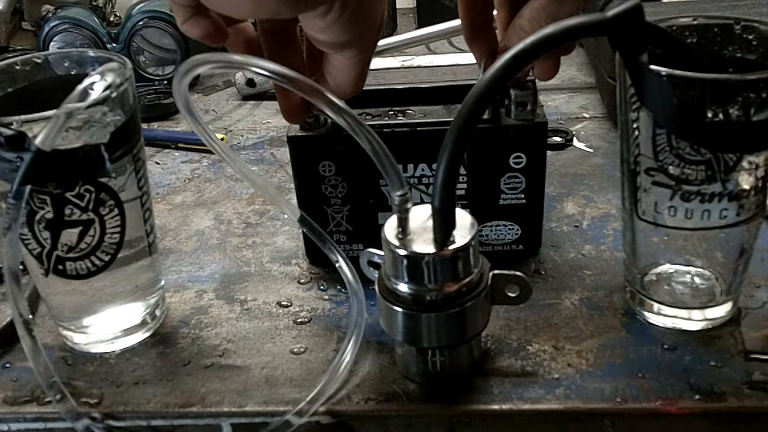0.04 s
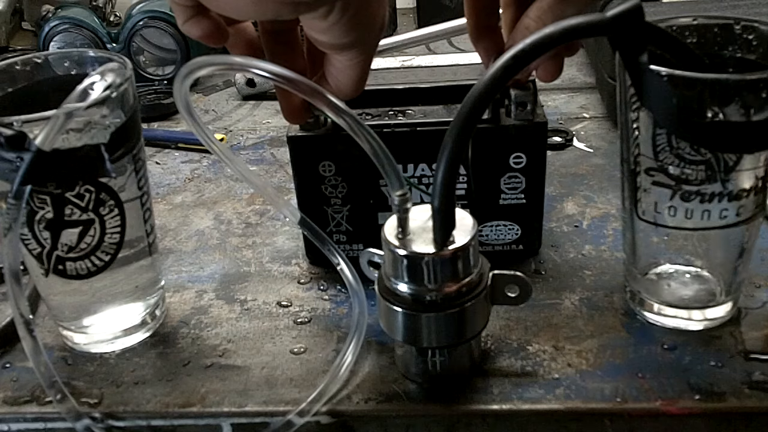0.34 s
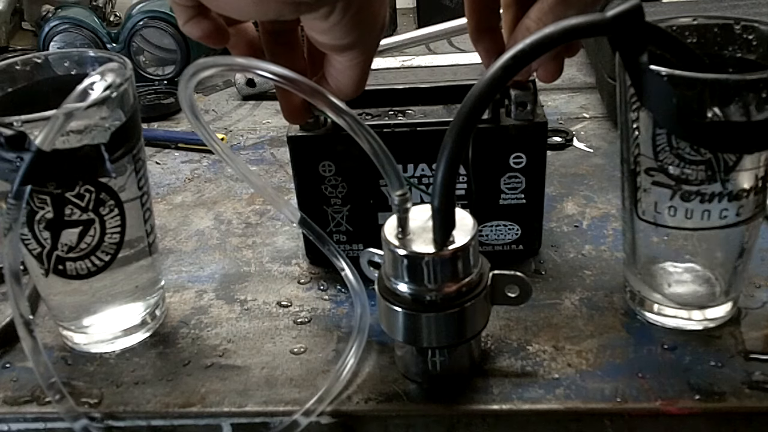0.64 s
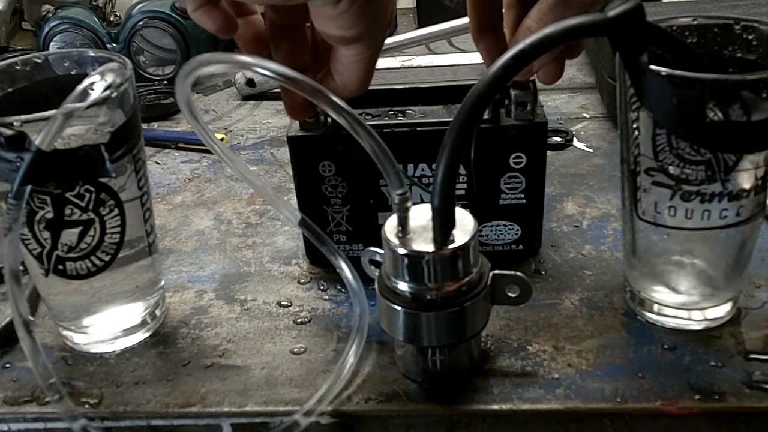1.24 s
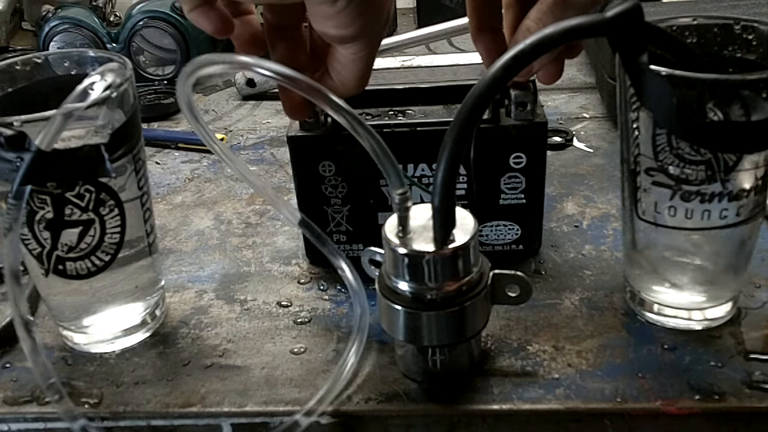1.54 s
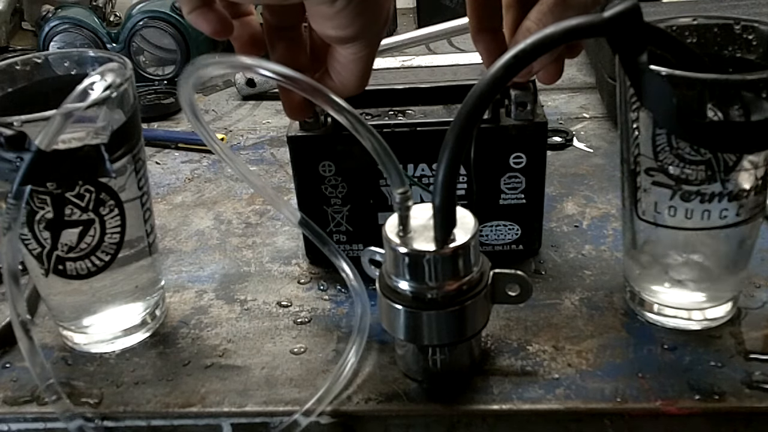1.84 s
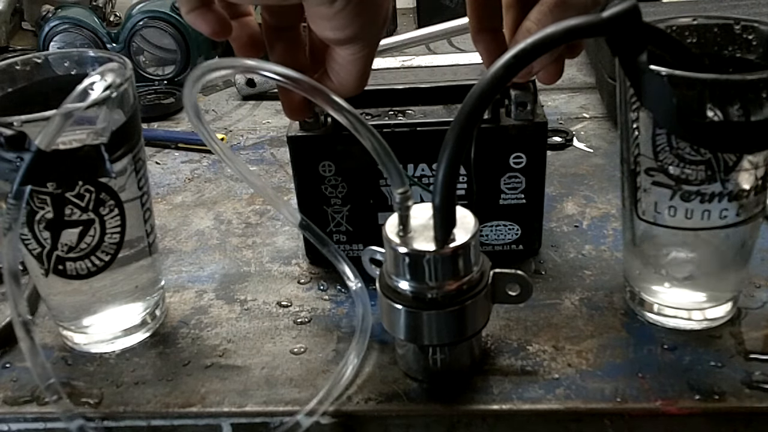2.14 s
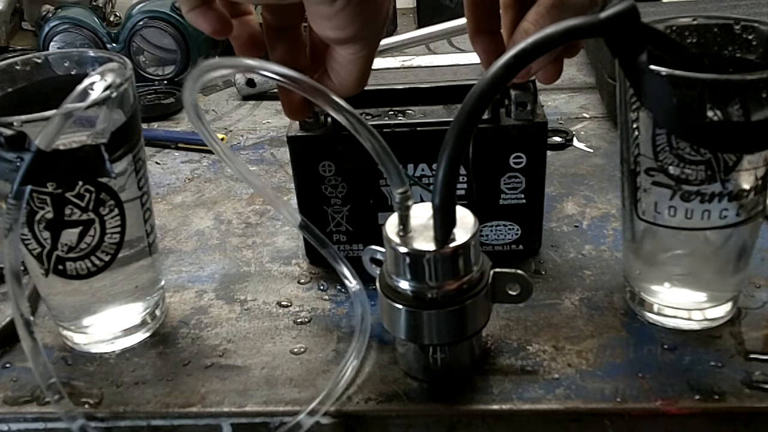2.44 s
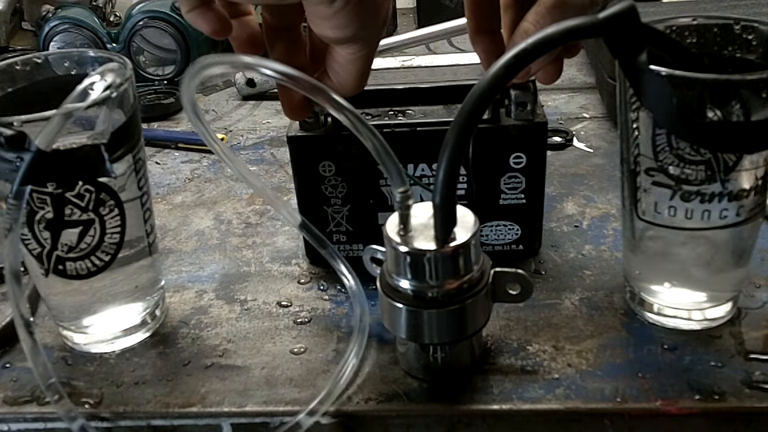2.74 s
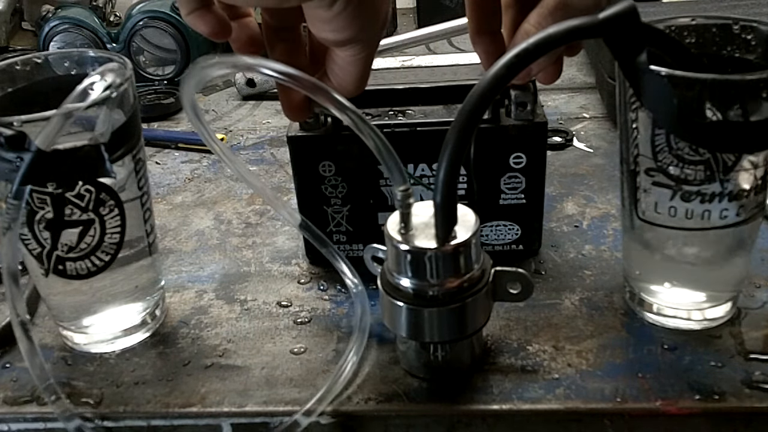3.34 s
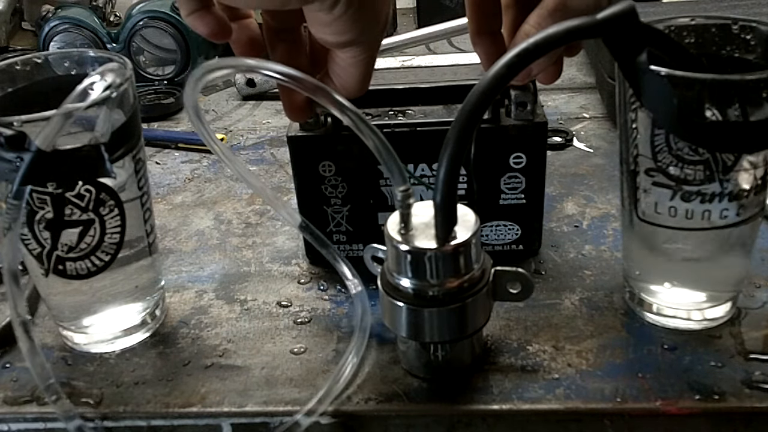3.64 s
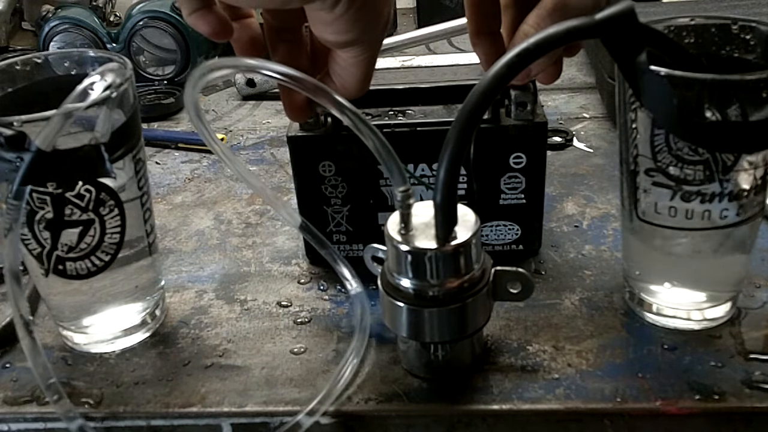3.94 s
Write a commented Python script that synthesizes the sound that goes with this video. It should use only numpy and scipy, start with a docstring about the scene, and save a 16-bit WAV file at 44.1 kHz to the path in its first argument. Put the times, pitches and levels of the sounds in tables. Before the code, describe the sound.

A small electric pump buzzes and sputters, then knocks rapidly and evenly on a workbench.

```python
"""A small electric plunger fuel pump primes itself on a workbench, running off a battery.
Dry, the plunger chatters fast against its end stop and the hose sputters into a glass. As liquid arrives
it slows to about ten strokes a second: each impact excites the modes of the bench and rattles the steel
case, and a lighter clack marks the return. Once primed, each return draws in liquid with a short gulp.
The workshop adds brief reverberation, faint air and a deep rumble."""
import sys
import numpy as np
from scipy import signal
from scipy.fft import rfft, irfft, next_fast_len
from scipy.io import wavfile
from scipy.ndimage import uniform_filter1d

SR = 44100
rng = np.random.default_rng(int(sys.argv[2]) if len(sys.argv) > 2 else 0)


def pcm_store(signal):
    """Save signal as 16-bit PCM."""
    levels = np.round(np.clip(np.atleast_2d(signal), -1, 1) * 32767)
    wavfile.write(sys.argv[1], SR, levels.astype(np.int16).T)


N = 176400
PRIMED_S, FULL_FLOW_S = 1.85, 3.15


def amp(db):
    return 10 ** (np.asarray(db) / 20)


def unit(x):
    return x / np.sqrt(np.mean(x ** 2) + 1e-20)


def along(points, hz):
    """Interpolation of (frequency, value) points on a logarithmic frequency axis."""
    f, v = np.transpose(points)
    return np.interp(np.log(hz + 1), np.log(f + 1), v)


def filtered(x, response):
    """Linear filtering: the spectrum of x is multiplied by a frequency response."""
    n = x.shape[-1]
    m = next_fast_len(n + 8192)
    return irfft(rfft(x, m) * response(np.fft.rfftfreq(m, 1 / SR)), m)[..., :n]


def noise(colour, shape):
    """Spectral shaping: white noise becomes coloured noise of rms 1."""
    return unit(filtered(rng.standard_normal(shape), lambda hz: amp(along(colour, hz))))


def pulse(t, peak_s, power):
    """Gamma envelope: it reaches 1 at peak_s, and a higher power narrows it."""
    return (t / peak_s * np.exp(1 - t / peak_s)) ** power


def place(times, levels, sounds):
    """Superposition: each sound is added at its time [s] with its gain [dB]."""
    out = np.zeros(N + SR)
    for s, db, sound in zip(times, levels, sounds):
        out[max(0, round(s * SR)):][:len(sound)] += amp(db) * sound
    return out[:N]


def blows(times, levels, colour, attack_s, hold_s, t60_s, alike, grain_db=0):
    """Impact response: densely spaced modes merge into exponentially decaying noise."""
    t = np.arange(SR // 5) / SR
    bursts = noise(colour, (len(times) + 1, len(t)))
    # 'alike' is the share of the power that is the same in every blow
    ringing = np.sqrt(alike) * bursts[0] + np.sqrt(1 - alike) * bursts[1:]
    envelope = np.minimum(t / attack_s, 1) * amp(-60 * np.maximum(t - attack_s - hold_s, 0) / t60_s)
    if grain_db:  # grain breaks the blow into tiny contacts
        lumps = unit(uniform_filter1d(rng.standard_normal((len(times), len(t))), size=50, axis=1))
        envelope = envelope * unit(amp(grain_db * np.minimum(lumps, 2)))
    return place(times, levels, envelope * ringing)


# spectra of the workshop's air and rumble (frequency [Hz], level [dB])
AIR_SPECTRUM = [(120, -10.5), (200, -2.5), (500, -8.5), (1200, -5), (2500, -26), (4500, -16), (7000, -24.5),
                (10000, -60), (15000, -47)]
RUMBLE_SPECTRUM = [(20, -4), (32, -14), (43, -6.5), (54, -6), (67, -6), (85, -12), (115, -14), (200, -62),
                   (600, -70)]
# course of the rumble (time [s], level [dB])
RUMBLE_LEVELS = [(0, -49), (.8, -45.5), (1.7, -48), (4, -49.5)]

def background():
    """Ambient noise: faint steady air lies over a deep, slowly drifting rumble."""
    rumble_db = np.interp(np.arange(N) / SR, *np.transpose(RUMBLE_LEVELS))
    return amp(-39.5) * noise(AIR_SPECTRUM, N) + amp(rumble_db) * noise(RUMBLE_SPECTRUM, N)


def fill(s):
    """State of the wet pump at times s: 1 priming, 2 primed, 3 full flow (0 stands for dry)."""
    return 1 + (s > PRIMED_S).astype(int) + (s > FULL_FLOW_S)


# modes of pump and bench (frequency [Hz], t60 [s], dry [dB], priming [dB], primed [dB], full flow [dB])
BENCH_MODES = [(150.8, 0.26, -8, -2, -5.5, -4), (180.9, 0.2, -6, -2.5, -4, -6.5),
               (224.2, 0.12, -10, -4.5, -5.5, -1), (322, 0.23, -16, -10.5, -14, -16),
               (359.2, 0.36, -18.5, -12, -11.5, -13.5), (380.8, 0.32, -10, -11.5, -3.5, -4.5),
               (449.8, 0.18, -4.5, -7.5, -9.5, -4), (501.3, 0.17, -11, -8, -20, -36),
               (569.3, 0.16, -7, -3, -7.5, -5), (662, 0.53, -19.5, -13, -14, -31),
               (672.4, 0.27, -18, -26, -16.5, -13.5), (728, 0.41, -22, -39, -13.5, -15),
               (792.3, 0.35, -12.5, -7.5, -9.5, -5.5), (835.6, 0.27, -17, -20, -13.5, -13),
               (882, 0.15, -20, -34, -15, -11), (944.6, 0.052, 2.5, 3.5, 1.5, 6.5),
               (971, 0.25, -5.5, -3, -5, -6), (1052, 0.08, -6.5, -2, -11, -12), (1108, 0.12, -6, -9, 1, -4),
               (1287, 0.036, -26, -21, -10, -13), (1394, 0.36, -17.5, -11.5, -17, -25),
               (1480, 0.053, -23, -7, -1.5, -1), (1786, 0.096, -20, -4, -4.5, -5),
               (1820, 0.14, -18, -10, -7.5, -9), (1950, 0.035, -18, -7, -5.5, -9),
               (2156, 0.033, -1.5, -3, -22, -1.5)]
SWELL_S, SWELL_POWER = .022, 1.5  # build-up time of the lowest mode; higher ones are much quicker

def bench(times, levels, states, scatter_db, slip_rad, dull_hz):
    """Modal superposition: each blow excites damped modes, in a balance set by how full the pump is."""
    t = np.arange(SR // 3) / SR
    table = np.array(BENCH_MODES)
    hz, t60, balance = table[:, :1], table[:, 1:2], table[:, 2:].T
    phase = np.pi * (2 * hz * t + np.arange(len(hz))[:, None])  # neighbours swing opposite ways
    swell = 1 - np.exp(-t / SWELL_S * (hz / hz[0]) ** SWELL_POWER)
    rings = np.exp(1j * phase) * amp(-60 * t / t60) * swell
    rings /= np.hypot(1, hz / dull_hz)  # soft blows spare the high modes
    size, shift = rng.standard_normal((2, len(times), len(hz)))
    weights = amp(balance[states] + scatter_db * size) * np.exp(1j * slip_rad * shift)
    return place(times, levels, (weights @ rings).imag)


# strokes of the empty pump (time [s], level [dB]), and how hard the strokes shake the bench over time (time
# [s], level [dB])
DRY_IMPACTS = [(0.0014, -13.5), (0.0258, -14.5), (0.0486, -18), (0.0757, -17), (0.1012, -16),
               (0.1272, -14.5), (0.1533, -19), (0.182, -17), (0.2067, -21), (0.233, -15), (0.2602, -18),
               (0.2883, -17.5), (0.316, -18), (0.3425, -18), (0.3728, -18), (0.4, -18), (0.4298, -17.5),
               (0.4575, -18), (0.4889, -18), (0.518, -18), (0.548, -18), (0.5805, -18), (0.613, -18),
               (0.6468, -18), (0.6804, -19)]
DRY_THUMP_LEVELS = [(0.0, -26), (0.2, -28.5), (0.37, -29.5), (0.6, -30.5), (0.72, -32.5)]
# spectra of the empty case, the impact's ping and the bench's knock (frequency [Hz], level [dB])
DRY_CASE_SPECTRUM = [(300, -7), (700, -7.5), (1500, -5), (2150, -5.5), (3000, -14), (4200, -0.5),
                     (5200, 1.5), (6800, -7.5), (8800, -34), (10300, -16.5), (11500, -40), (13000, -20),
                     (15000, -43)]
PING_SPECTRUM = [(2000, -16), (3300, 1.5), (3800, -0.5), (4100, 5), (4500, -1.5), (5100, -7), (5600, -4.5),
                 (8000, -21), (10000, -17.5), (11000, -25), (13200, -27), (16000, -49)]
KNOCK_SPECTRUM = [(60, -29), (120, -26), (170, -3), (300, -24.5), (600, -1.5), (1000, 5), (1600, -6.5),
                  (2100, -1), (3000, -14), (6000, -30)]
REBOUND_SHARE, REBOUND_DB = .35, -7.5  # spacing as a fraction of the cycle; loss at each rebound

def dry_chatter():
    """Inelastic collision: the unloaded plunger hits its stop and rebounds twice, weaker each time."""
    s, db = np.transpose(DRY_IMPACTS)
    bounce = np.arange(3)[:, None]
    hits = (s + bounce * REBOUND_SHARE * np.gradient(s)).ravel()
    hit_db = (db + bounce * REBOUND_DB).ravel()
    thump_db = np.interp(hits, *np.transpose(DRY_THUMP_LEVELS))
    thump_db += np.repeat(bounce * REBOUND_DB, len(s)) / 2  # the thump loses half as many dB
    case = blows(hits, hit_db - 13.5, DRY_CASE_SPECTRUM,
                 attack_s=0.00055, hold_s=0.00091, t60_s=0.21, alike=0.23)
    ping = blows(hits, hit_db - 5.5, PING_SPECTRUM,
                 attack_s=0.00022, hold_s=0.0019, t60_s=0.021, alike=0.17)
    knock = blows(hits, thump_db - 5.5, KNOCK_SPECTRUM,
                  attack_s=0.0015, hold_s=0.0021, t60_s=0.056, alike=0.2)
    ring = bench(s, thump_db[:len(s)] + 0.5, np.zeros(len(s), int),
                 scatter_db=3, slip_rad=0.99, dull_hz=3980)
    return case + ping + knock + ring


# spurts from the hose (time [s], level [dB])
HOSE_SPITS = [(0.001, -22.5), (0.042, -27.5), (0.076, -27.5), (0.104, -30.5), (0.133, -25), (0.161, -27),
              (0.184, -36), (0.204, -29.5), (0.23, -36.5)]
# spectrum of a spurt (frequency [Hz], level [dB])
SPIT_SPECTRUM = [(100, -12), (150, 3), (280, -7), (600, -4.5), (900, -4), (1250, -3), (1800, -3.5),
                 (2300, -7.5), (3200, -8), (7000, -39)]

def spits():
    """Transient flow noise: at first the hose spits air and liquid into the glass."""
    s, db = np.transpose(HOSE_SPITS)
    return blows(s, db, SPIT_SPECTRUM,
                 attack_s=0.0005, hold_s=0.0057, t60_s=0.2, alike=0.077, grain_db=-0.5)


# air bubbles in the glass (time [s], starting frequency [Hz], peak level [dB])
BUBBLES = [(0.025, 328, -29), (0.054, 635.5, -26.5), (0.118, 364, -24), (0.152, 458, -32),
           (0.241, 378.6, -26.5), (0.44, 436.5, -27.5), (0.552, 432, -36)]
GLUG_RISE_PER_S = 0.85  # relative climb of the pitch

def glugs():
    """Bubble resonance: each big bubble in the glass sounds a short rising note."""
    s, hz, db = np.transpose(BUBBLES)
    t = np.arange(SR // 6) / SR
    phase = 2 * np.pi * np.cumsum(hz[:, None] * (1 + GLUG_RISE_PER_S * t), axis=1) / SR
    return place(s, db, pulse(t, peak_s=0.022, power=3) * np.sin(phase))


# strokes against liquid (time [s], thump level [dB], rattle level [dB])
PUMP_STROKES = [(0.72, -32, -29), (0.811, -27.5, -28.5), (0.905, -28.5, -27.5), (1.0014, -28, -29),
                (1.101, -28, -26.7), (1.2002, -27.5, -27), (1.3024, -28, -29), (1.4033, -28, -28),
                (1.5041, -28, -29), (1.6056, -29.5, -30), (1.705, -28.5, -28), (1.8054, -29.5, -31.5),
                (1.8964, -28.5, -29.5), (1.9893, -28, -28.5), (2.0828, -29, -29), (2.176, -28, -29),
                (2.2701, -28, -30), (2.3637, -28.5, -28.5), (2.4568, -27.5, -28), (2.5498, -28, -28.5),
                (2.6433, -28.5, -29), (2.737, -28.5, -28.5), (2.8305, -28.5, -28), (2.925, -30, -28.5),
                (3.0187, -29, -28), (3.1116, -30, -28), (3.2066, -30.5, -28), (3.3008, -29.5, -29.5),
                (3.3946, -30, -29), (3.49, -29, -28), (3.5839, -29, -28.5), (3.6799, -28.5, -28.5),
                (3.775, -29.5, -27.5), (3.8691, -29, -28.5), (3.965, -28, -27.5)]
# spectra of the steel case, its sharp tick and liquid rustling in the hose (frequency [Hz], level [dB])
CASE_SPECTRUM = [(300, -18), (1000, -21), (2000, -8.5), (3200, 0.5), (4300, 2.5), (5300, 1), (6800, -8),
                 (9000, -22.5), (13000, -24), (16000, -57)]
TICK_SPECTRUM = [(500, -17.5), (2000, -5), (4200, 2), (6500, -2), (8500, -8.5), (10200, -5), (11500, -22.5),
                 (13000, -9.5), (14600, -20.5), (16000, -73)]
SPLASH_SPECTRUM = [(200, -25), (450, 9), (800, 1), (1400, -3), (2000, -14), (3000, -44)]

def pumping():
    """Impact excitation: each stroke thumps the bench, rattles the case and sends liquid up the hose."""
    s, thump_db, rattle_db = np.transpose(PUMP_STROKES)
    airy = s < PRIMED_S
    ring = bench(s, thump_db + 0.5, fill(s), scatter_db=-0.13, slip_rad=0.069, dull_hz=3900)
    knock = blows(s, thump_db - 3.5, KNOCK_SPECTRUM,
                  attack_s=0.00041, hold_s=0.019, t60_s=0.1, alike=0.92)
    case = blows(s + 0.001004, rattle_db + 2, CASE_SPECTRUM,
                 attack_s=0.0028, hold_s=0.0045, t60_s=0.065, alike=0.2, grain_db=1)
    tick = blows(s + 0.001231, rattle_db + 0.5, TICK_SPECTRUM,
                 attack_s=0.0016, hold_s=0.0046, t60_s=0.012, alike=0.2, grain_db=-1)
    # the case rattles a second time while air is left inside
    again = blows(s[airy] + 0.012, rattle_db[airy] + 1, CASE_SPECTRUM,
                  attack_s=0.00049, hold_s=0.0013, t60_s=0.077, alike=0.055, grain_db=2.5)
    again += blows(s[airy] + 0.0105, rattle_db[airy] + 2, TICK_SPECTRUM,
                   attack_s=0.0005, hold_s=0.0015, t60_s=0.008, alike=0.2)
    splash = blows(s + 0.036, thump_db + np.where(airy, -6, -12.5), SPLASH_SPECTRUM,
                   attack_s=0.0031, hold_s=0.0051, t60_s=0.12, alike=0.29)
    return ring + knock + case + tick + again + splash


# low notes of the pressure surge in the hose (frequency [Hz], time to peak [s], relative level [dB])
SURGE_TONES = [(167.7, 0.021, -8), (372.7, 0.012, -16)]
SURGE_PRIMING_DB = -5

def surges():
    """Pressure surge: each stroke pushes liquid into the hose with a soft thump, fuller once primed."""
    s, db, _ = np.transpose(PUMP_STROKES)
    t = np.arange(SR // 8) / SR
    surge = sum(amp(level) * pulse(t, peak_s, power=4) * np.sin(2 * np.pi * hz * t)
                for hz, peak_s, level in SURGE_TONES)
    return place(s, db + SURGE_PRIMING_DB * (s < PRIMED_S), [surge] * len(s))


# blows on the end stop while air is left in the chamber (time [s], level [dB])
STOP_IMPACTS = [(0.7522, -14), (0.841, -11), (0.9356, -12), (1.0322, -11.5), (1.131, -15), (1.2304, -14.5),
                (1.3322, -14.5), (1.4339, -17), (1.5345, -16.5), (1.6349, -18.5), (1.7355, -19)]

def end_stops():
    """Hydraulic damping: a hard steel snap fades, stroke by stroke, as liquid cushions the plunger."""
    s, db = np.transpose(STOP_IMPACTS)
    snap = blows(s, db - 10.5, TICK_SPECTRUM,
                 attack_s=0.00078, hold_s=0.001, t60_s=0.0095, alike=0.65, grain_db=2.5)
    case = blows(s, db - 9, CASE_SPECTRUM, attack_s=0.0015, hold_s=0.0011, t60_s=0.026, alike=0.3)
    return snap + case


# returns of the plunger (time [s], level [dB])
RETURN_IMPACTS = [(0.7858, -26), (0.879, -26.5), (0.974, -28), (1.0726, -26), (1.1722, -27.5),
                  (1.2749, -27.5), (1.3745, -27), (1.4739, -28.5), (1.5768, -27.5), (1.677, -28),
                  (1.7752, -27), (1.8617, -27.5), (1.9539, -25.5), (2.0477, -25.5), (2.1413, -27.5),
                  (2.2345, -26.5), (2.3292, -27.5), (2.4213, -27.5), (2.5149, -28), (2.6093, -27),
                  (2.702, -26.5), (2.796, -26.5), (2.8901, -26.5), (2.9839, -26), (3.0784, -27.5),
                  (3.1721, -27.5), (3.2671, -27.5), (3.3604, -27), (3.4548, -27.5), (3.5506, -26.5),
                  (3.6445, -26), (3.739, -28), (3.8355, -27), (3.9296, -26)]

def returns():
    """Structure-borne sound: the plunger comes back with a light clack that also nudges the bench."""
    s, db = np.transpose(RETURN_IMPACTS)
    case = blows(s, db + 0.32, CASE_SPECTRUM, attack_s=0.00044, hold_s=0.0023, t60_s=0.048, alike=0.08)
    tick = blows(s, db - 8, TICK_SPECTRUM,
                 attack_s=0.00037, hold_s=0.0032, t60_s=0.0094, alike=0.11, grain_db=1.5)
    knock = blows(s, db - 6.5, KNOCK_SPECTRUM, attack_s=0.00049, hold_s=0.0011, t60_s=0.086, alike=0.66)
    ring = bench(s, db - 10.5, fill(s), scatter_db=0.8, slip_rad=0.12, dull_hz=450)
    return case + tick + knock + ring


# strength of the intake note (time [s], peak level [dB])
GULP_LEVELS = [(1.85, -32.5), (2.5, -33.5), (3.0, -46), (4.0, -38)]
GULP_HZ, GULP_FALL_HZ_PER_S = 1406, 4400

def gulps():
    """Suction: once primed, each return draws in liquid with a short falling chirp."""
    s = np.array([time for time, _ in RETURN_IMPACTS if time > PRIMED_S])
    t = np.arange(SR // 8) / SR
    detune, size = rng.standard_normal((2, len(s)))
    hz = GULP_HZ * (1 + .015 * detune[:, None]) - GULP_FALL_HZ_PER_S * t
    notes = pulse(t, peak_s=0.0073, power=2) * np.sin(2 * np.pi * np.cumsum(hz, axis=1) / SR)
    db = np.interp(s, *np.transpose(GULP_LEVELS)) + 0.5 * size
    return place(s + 0.00101, db, notes)


# reverberation time of the workshop (frequency [Hz], t60 [s])
ROOM_DECAY = [(150, 0.21), (1000, 0.67), (4000, 0.33), (10000, 0.21)]
# colour of the sound that feeds the reverberation (frequency [Hz], gain [dB])
ROOM_COLOUR = [(150, -14.5), (700, -4.5), (1200, -2.5), (2000, -2), (4000, -1.5)]
ROOM_DB, ROOM_DELAY_S = -8, .004

def room(x, count=12):
    """Reverberation: each of 'count' stretches of x is convolved with its own decaying noise tail."""
    hz, t, spectra = signal.stft(rng.standard_normal((count, SR // 3)), SR, nperseg=256)
    decay = amp(-60 * t / along(ROOM_DECAY, hz)[:, None])
    tails = signal.istft(spectra * decay, SR, nperseg=256)[1]
    pieces = filtered(x, lambda f: amp(along(ROOM_COLOUR, f))).reshape(count, -1)
    answers = signal.fftconvolve(pieces, tails / np.linalg.norm(tails[0]), axes=1)
    starts = np.arange(count) * pieces.shape[1] / SR
    return place(starts + ROOM_DELAY_S, np.zeros(count), answers)


LEFT_LAG_S, MONO_BELOW_HZ = 2.15e-5, 840

def scene():
    """Arrival-time difference puts the pump just right of centre; bass reaches both sides together."""
    pump = dry_chatter() + spits() + glugs() + pumping() + surges() + returns() + end_stops() + gulps()
    sound = pump + amp(ROOM_DB) * room(pump) + background()
    lag_s = lambda hz: LEFT_LAG_S * hz ** 2 / (hz ** 2 + MONO_BELOW_HZ ** 2)
    sides = np.array([[-1], [1]])  # left is delayed and right advanced, each by half the lag
    return filtered(sound, lambda hz: np.exp(1j * np.pi * hz * lag_s(hz) * sides))


# dips in the sound at the microphone (frequency [Hz], half-width [Hz], gain [dB])
MIC_NOTCHES = [(2717, 258, -15.5), (5498, 124, -19.5), (7914, 290, -25.5), (11070, 170, -13),
               (11630, 290, -9)]
TOP_HZ = 15600

def record(dry):
    """Frequency response: the microphone has a comb of dips and a steep band limit."""
    def response(hz):
        dips_db = sum(db / (1 + ((hz - centre) / width) ** 2) for centre, width, db in MIC_NOTCHES)
        return amp(dips_db) / (1 + (hz / TOP_HZ) ** 80)
    return filtered(dry, response)


dry = scene()
out = record(dry)
pcm_store(out)
```